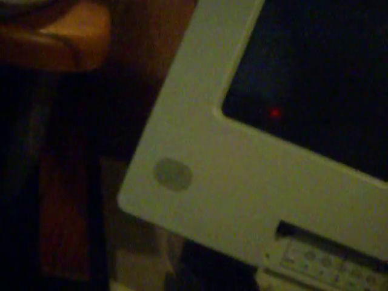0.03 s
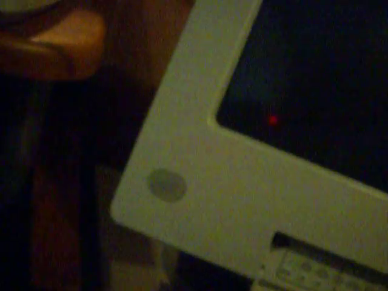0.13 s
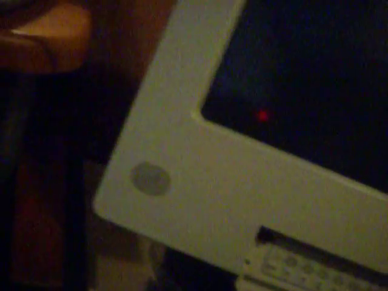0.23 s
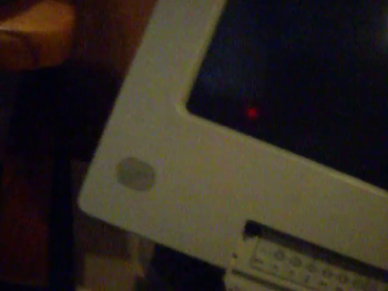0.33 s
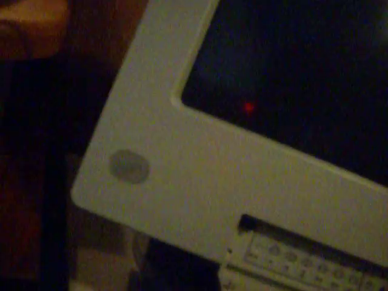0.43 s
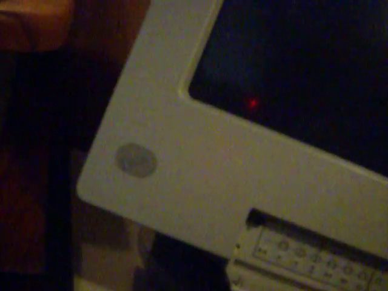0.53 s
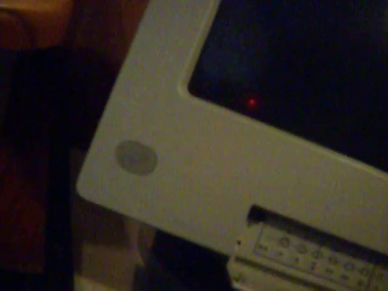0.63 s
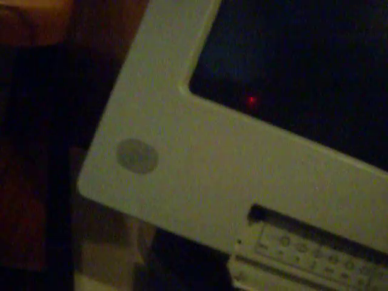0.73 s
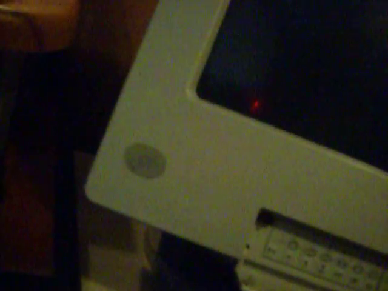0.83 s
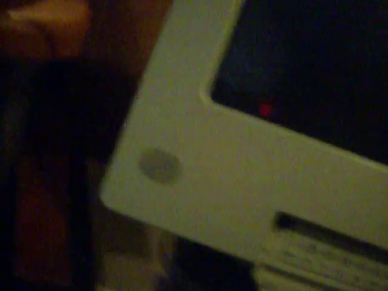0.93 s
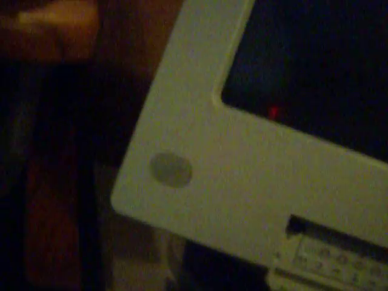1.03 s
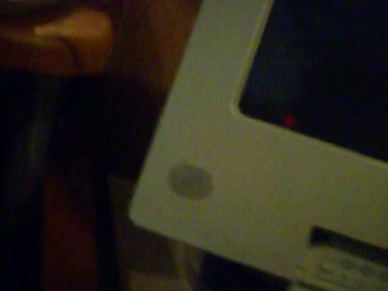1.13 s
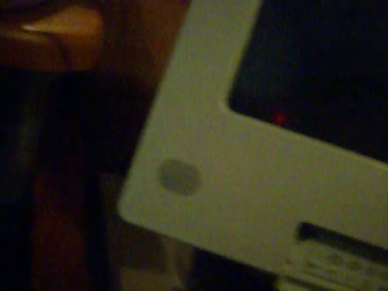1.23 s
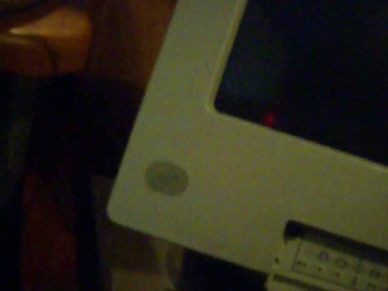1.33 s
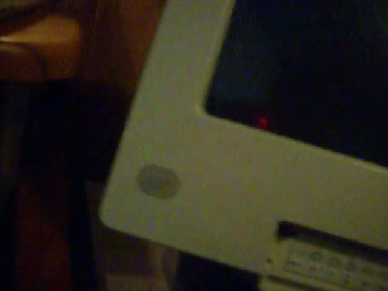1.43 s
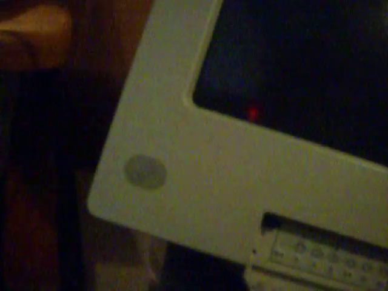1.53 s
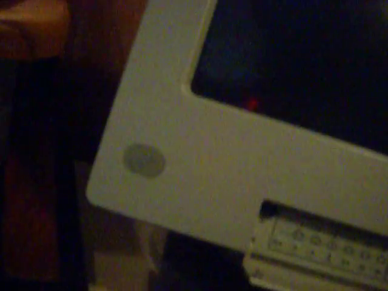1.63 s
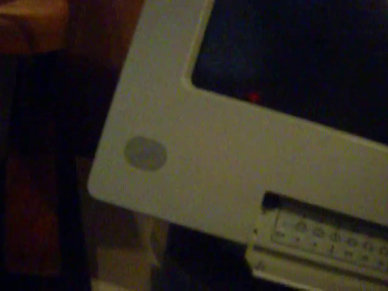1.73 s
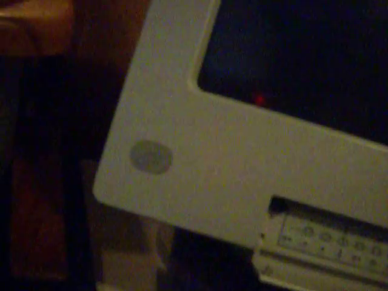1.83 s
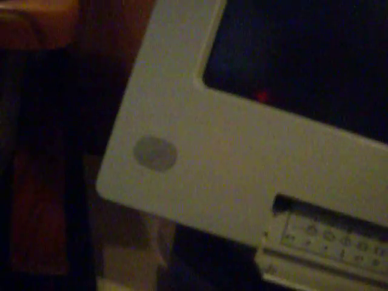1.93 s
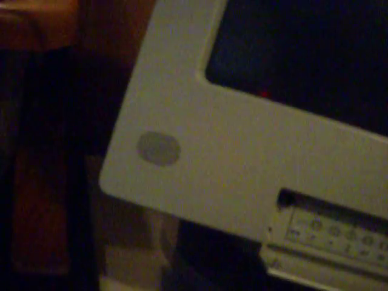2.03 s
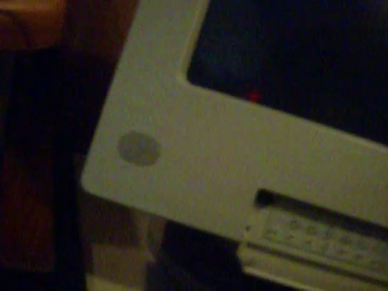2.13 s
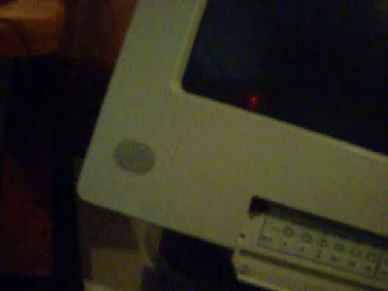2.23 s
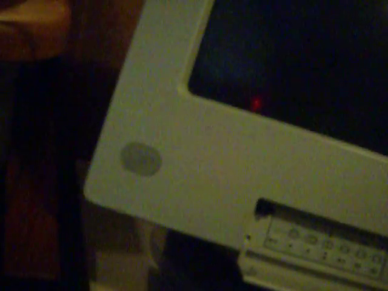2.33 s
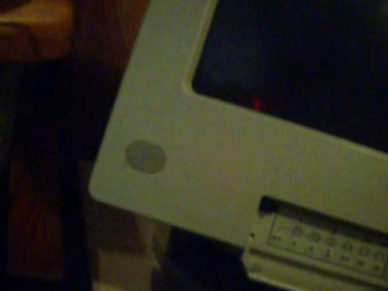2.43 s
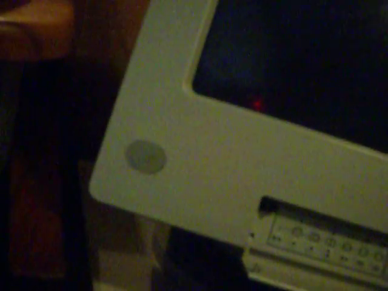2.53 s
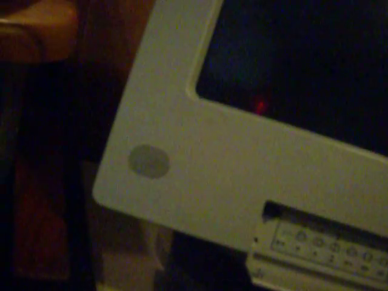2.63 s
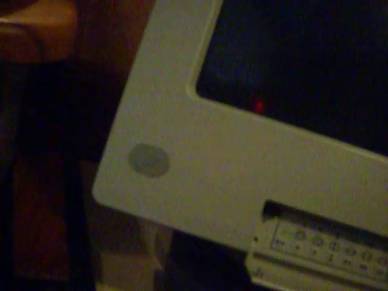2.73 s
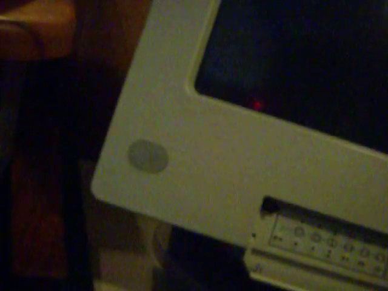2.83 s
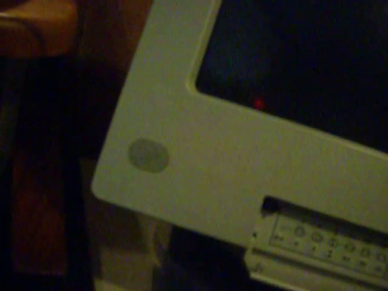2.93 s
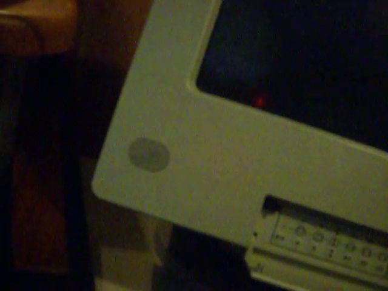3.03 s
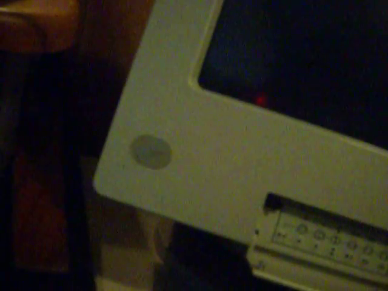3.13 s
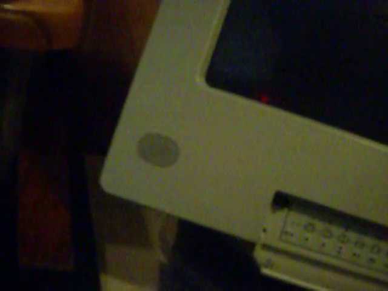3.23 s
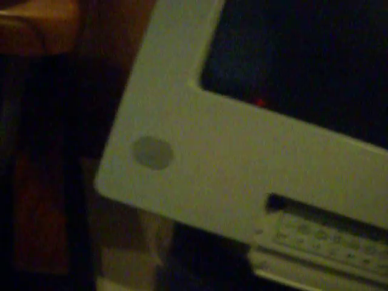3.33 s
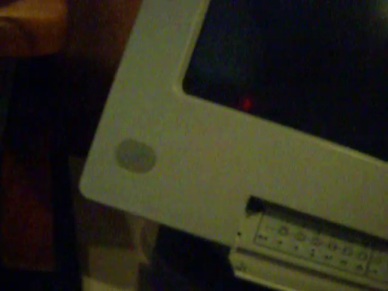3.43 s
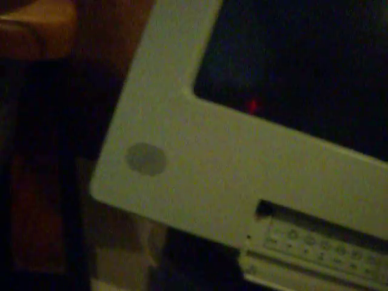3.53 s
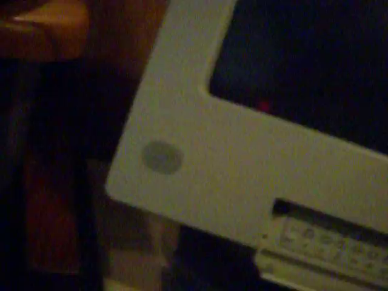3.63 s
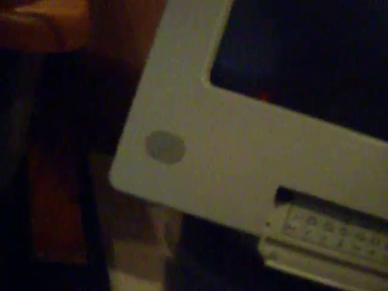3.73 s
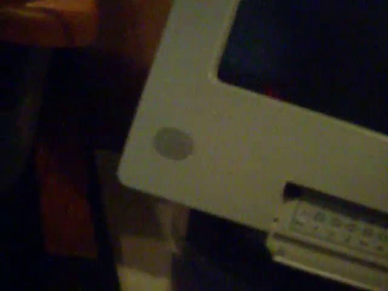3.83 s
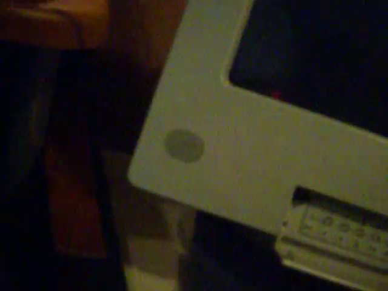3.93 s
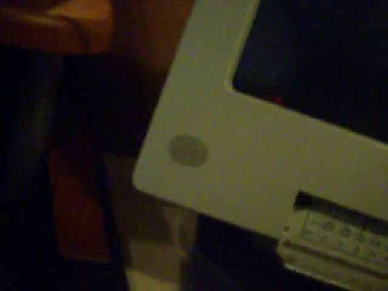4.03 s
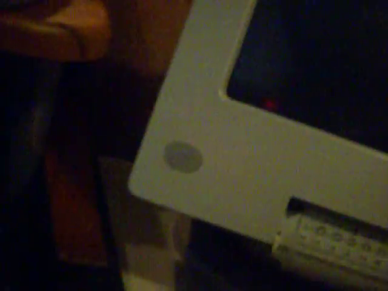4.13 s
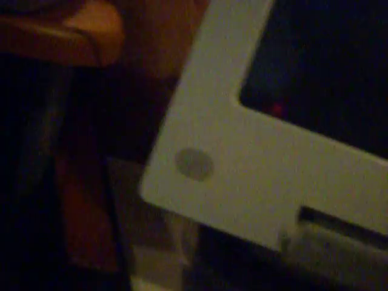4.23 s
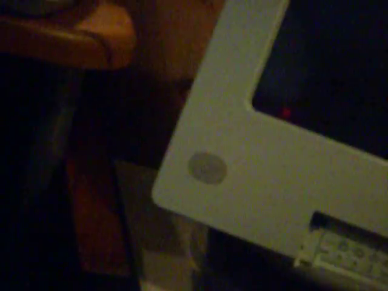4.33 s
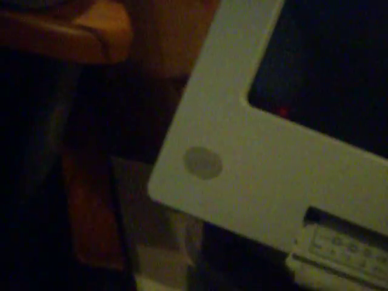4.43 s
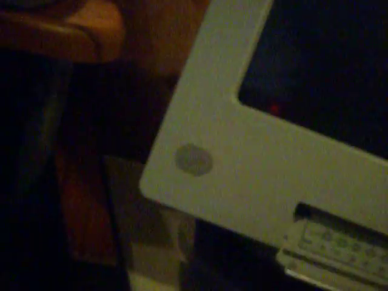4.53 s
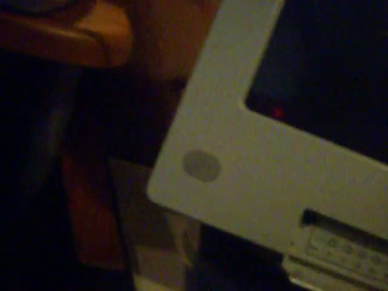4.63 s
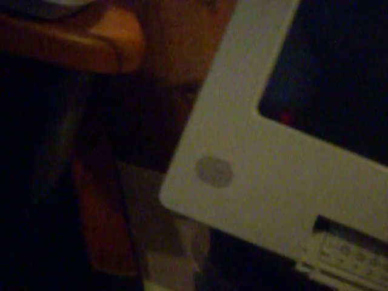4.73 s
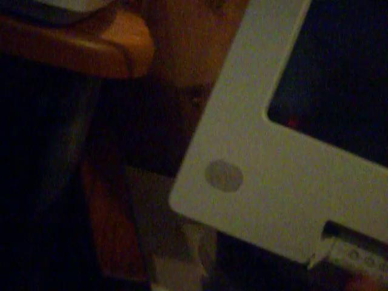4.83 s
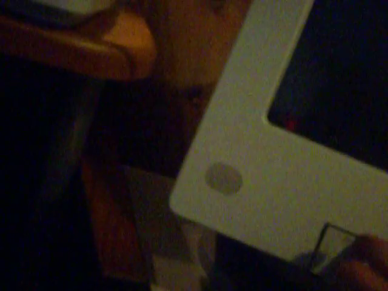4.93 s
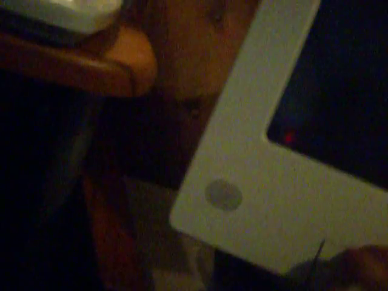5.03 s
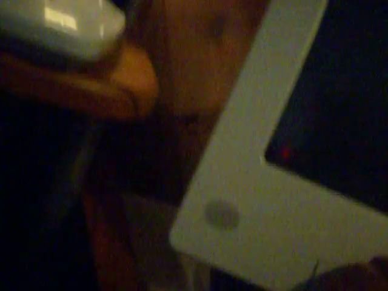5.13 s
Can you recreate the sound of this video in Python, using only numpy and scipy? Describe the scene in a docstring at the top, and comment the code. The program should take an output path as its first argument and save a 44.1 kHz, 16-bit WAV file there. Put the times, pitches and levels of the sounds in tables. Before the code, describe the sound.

Hollow plastic knocks, clicks and rattles on an old monitor's cabinet, in bursts growing louder, over quiet room hum and thin high whine.

```python
"""Plastic cabinet, close, in a quiet room

A switch, a relay and a flap of a plastic monitor cabinet click, knock and rattle near a small camera's microphone.
Each blow rings the modes of five cabinet parts by a touch and dying chatter; fingers brush as grainy noise.
Behind lie noise-made room air with the bands of a fan, hiss, and two thin high tones from the electronics.
A sparse-tap room adds reverberation; the microphone chain overloads softly and rolls off the treble.
"""
import sys
import numpy as np
from scipy import signal
from scipy.fft import rfft, irfft
from scipy.io import wavfile
from scipy.ndimage import uniform_filter1d

SR = 44100
rng = np.random.default_rng(int(sys.argv[2]) if len(sys.argv) > 2 else 0)


def dump(signal):
    """Clip the signal to [-1, 1] and save it as 16-bit WAV at the path in sys.argv[1]."""
    limited = np.clip(np.atleast_2d(signal).T, -1, 1)
    pcm = np.round(limited * 32767).astype(np.int16)
    wavfile.write(sys.argv[1], SR, pcm)


N = 228961  # length in samples

# Background air, shape before overall levelling: f/Hz, level/dB per Hz
AIR_SPECTRUM = [(12, -24), (20, -18), (59, -5.5), (186, -4), (286, -2), (606, -8), (732, -4.5),
                (815, -10.5), (957, -6), (1470, -16), (5490, -24), (6620, -23), (7180, -26), (10700, -23),
                (12300, -27), (16000, -81), (22000, -120)]
AIR_DB = -44.5  # rms level of the air
# Fan bands in the room: f/Hz, width/Hz, rms level/dB
FAN_BANDS = [(60, 3.8, -57.5), (118, 3, -63), (264, 118, -47.5), (711.7, 16, -55), (2480, 19, -65.5)]
# Dips of the background around the longest rattles: t/s, full depth/dB, sinking time/s
BACKGROUND_DIPS = [(1.86, -2.5, 0.044), (3.3, -2.5, 0.044), (4.05, -13.5, 0.12), (4.88, -16, 0.053)]
# Kicks of the microphone's resting line by the hardest blows: t/s, signed height scale/full scale
LINE_KICKS = [(1.858, -0.029), (3.129, -0.036), (3.299, 0.016), (4.062, 0.03), (4.42, 0.006),
              (4.885, 0.045)]
# Fingers sliding on the plastic and on the camera: t/s, length/s, level/dB, centre f/Hz
FINGER_RUBS = [(0.61, 1, -52.5, 60), (1.481, 0.47, -49, 2400), (1.576, 0.089, -52, 3900),
               (2.534, 0.11, -39, 236), (3.85, 0.44, -53, 2420), (1.996, 0.094, -50, 1880),
               (4.256, 0.044, -43, 3100), (4.401, 0.049, -35, 2620)]
# Blows on the cabinet: t/s, knock level/dB, clack level/dB, click level/dB, tick level/dB,
# struck spot f/Hz, chatter t60/s (before each part's own settling factor)
CABINET_BLOWS = [(0.051, -32.5, -41.5, -52, -52, 1170, .11), (0.453, -18, -43, -35, -40, 930, 0.13),
                 (1.249, -31, -54, -55, -52, 734, 0.11), (1.339, -32, -55, -54, -52, 600, 0.092),
                 (1.373, -25, -38, -39.5, -45, 910, 0.092), (1.592, -29, -39, -49, -46, 840, 0.087),
                 (1.647, -26, -47, -49, -51, 1030, 0.25), (1.747, -32, -29, -35, -46, 730, 0.2),
                 (1.788, -24.5, -28, -30.5, -49, 1270, 0.16), (1.8, -17, -25.5, -50, -44, 690, 0.17),
                 (1.858, -10.5, -11, -12, -12.5, 880, 0.12), (1.868, -11.5, -29, -33, -41, 810, 0.24),
                 (1.881, -28, -24, -26, -34, 751, 0.13), (1.906, -18, -20.5, -22.5, -25, 715, 0.11),
                 (1.917, -20.5, -31, -40, -50, 1000, .16), (1.973, -34, -32, -41, -48, 770, .14),
                 (2.001, -22, -27, -29, -46, 880, 0.12), (2.009, -23, -34, -31, -48, 690, .12),
                 (2.019, -12.5, -27, -36, -39, 900, 0.17), (2.054, -19, -23, -27, -28.5, 620, 0.21),
                 (2.065, -28, -19.5, -18, -40, 600, 0.083), (2.074, -20, -13, -26, -26.5, 1240, 0.076),
                 (2.085, -17.5, -19, -38, -45, 1270, 0.064), (2.113, -18.5, -23, -29, -32, 910, 0.12),
                 (2.158, -28, -50, -54, -54, 395, 0.066), (2.338, -31, -53, -49, -54, 720, 0.25),
                 (2.363, -29, -33.5, -39.5, -55, 1160, 0.12), (2.58, -37.5, -55, -54, -54, 400, 0.079),
                 (2.799, -31.5, -31, -37.5, -53, 885, 0.091), (2.955, -38, -35.5, -38, -54, 730, 0.1),
                 (3.1, -49, -36, -42, -48, 937, .1), (3.106, -31, -25, -34.5, -47, 1170, 0.098),
                 (3.128, -14, -16, -11, -22.5, 820, .22), (3.174, -11, -18.5, -20.5, -44, 810, 0.15),
                 (3.262, -22, -34, -39, -53, 960, 0.35), (3.283, -22, -22, -30, -36, 920, 0.24),
                 (3.3, -10, -14, -10.5, -17, 870, 0.19), (3.304, -8.5, -14, -33, -21, 870, 0.1),
                 (3.408, -32, -57, -56, -54, 412, 0.066), (4.04, -1.5, -6.5, -18, -18, 695, 0.048),
                 (4.046, -5, -8, -12.5, -21, 650, 0.069), (4.052, -17.5, -15.5, -21, -24, 700, 0.18),
                 (4.058, -18, -15, -10, -12.5, 680, 0.13), (4.114, -16, -21, -30.5, -34, 910, 0.21),
                 (4.281, -21, -32, -37, -50, 651, 0.34), (4.3, -3.5, -8, -20, -22.5, 1100, 0.056),
                 (4.313, -8.5, -18, -23.5, -31, 686, 0.14), (4.419, -1, -23, -20.5, -26.5, 750, 0.083),
                 (4.424, -18, -26, -35, -48, 510, 0.12), (4.5, -6, -17.5, -22, -29.5, 870, 0.12),
                 (4.555, -9, -23, -37, -48, 900, 0.13), (4.665, -4, -20, -25, -40, 755, 0.1),
                 (4.76, -25.5, -28.5, -34, -41, 869, 0.094), (4.862, -19.5, -35, -38, -48, 630, 0.16),
                 (4.88, -15, -19.5, -14, -15, 806, 0.22), (4.891, -18.5, -9.5, -21.5, -30, 700, 0.066),
                 (4.899, -14, -13, -18, -23, 1000, 0.068), (4.903, -26, -22, -25, -23, 1100, 0.036),
                 (4.911, -34, -29, -29, -45, 800, 0.06), (4.966, -31.5, -38, -34, -46, 738, 0.13),
                 (5.135, -20, -27, -29, -34.5, 1090, 0.19), (5.167, -12, -23, -24.5, -31.5, 900, .17)]
# Modes of the five cabinet parts, low to high, levels relative within a part: f/Hz, level/dB, t60/s
THUD_MODES = [(140, -16, 0.074), (224, -9, 0.092), (284, 4, 0.031), (338, -9, 0.027), (396.6, 6, 0.025),
              (479, -10.5, 0.07)]
KNOCK_MODES = [(605, -14, 0.011), (680, -2.5, 0.067), (718, 8.5, 0.025), (770, 6.5, 0.028),
               (867, 9.5, 0.045), (910, 0, 0.018), (1026, 13, 0.018), (1243, 7.5, 0.022), (1185, -21, 0.06),
               (1410, -15, 0.075), (1550, -39, 0.063)]
CLACK_MODES = [(1550, -27, .008), (2130, 19.5, 0.0032), (2060, -14, 0.026), (2250, -12, 0.0039),
               (2370, -7, 0.0071), (2620, 13, 0.0033)]
CLICK_MODES = [(2884, 3.5, 0.012), (3424, 21, 0.011), (3640, -0.5, 0.014), (3900, 20, 0.0056),
               (4200, -15, 0.0044), (4180, 10, 0.0058)]
TICK_MODES = [(6050, 13.5, 0.0018), (6180, -6.5, 0.001), (6840, -5, 0.00053), (8170, -4.5, 0.0019)]
# Room decay by band: f/Hz, t60/s
ROOM_DECAY = [(200, 0.22), (800, 0.4), (2500, 0.26), (8000, 0.26)]
# Treble response of the microphone chain: f/Hz, level/dB
MIC_ROLL_OFF = [(9000, 0.5), (10500, -2.5), (11500, -11), (12300, -24)]

WHINE_HZ, WHINE_DB = 6570, -52  # frequency between phase slips
FRAME_S, FIRST_S, SLIP_TURNS = .05001, .0024, .54  # frame period, first slip, turns lost per slip
PIPE_HZ, PIPE_DB = 7849.4, -65  # steady tone
SINK_CURVE, RECOVER_S = 0.54, 0.18  # dip: power of the sinking curve, recovery time constant
RISE_S, CLACK_HZ = 0.00092, 2140  # rise time of the contact noise, clack pitch
# the thud lies under the knock and grows on low-pitched spots
THUD_DB, THUD_DB_PER_OCTAVE, MIDDLE_HZ = -13, -16, 800
LUMPY = 0.55  # chatter is made of uneven contacts: 0 smooth, more = a few large ones
ROOM_DB, ROOM_TURN_HZ = -12.5, 8.2  # reverberation level, rotation rate of its three tails
EDGE_HZ = 12430  # upper band limit of the microphone chain


def gain_of(db):
    """dB to gain."""
    return 10 ** (np.asarray(db) / 20)


def evened(x):
    """Scales to rms 1."""
    return x / np.sqrt(np.mean(x ** 2) + 1e-20)


def read(points, hz):
    """Reads a spectrum on a log-frequency axis."""
    f, value = np.transpose(points)
    return np.interp(np.log(hz + 1), np.log(f + 1), value)


def add(mix, s, sound):
    """Mixes a sound in at s seconds."""
    part = mix[round(s * SR):][:len(sound)]
    part += sound[:len(part)]


def resonate(x, hz, width):
    """A two-pole resonance of gain 1."""
    return signal.lfilter(*signal.iirpeak(hz, hz / width, SR), x)


def room_air():
    """Room rumble and hiss from random short-time spectra, the bass slightly patchy, plus the fan's fuzzy bands."""
    frames, hz = N // 256 + 5, np.fft.rfftfreq(1024, 1 / SR)[:, None]
    real, imaginary, patches = rng.standard_normal((frames, 513, 3)).T
    patches = uniform_filter1d(patches, 8, 0)
    patches = evened(uniform_filter1d(patches, 12, 1))
    level_db = read(AIR_SPECTRUM, hz) + 3.2 * patches / (1 + hz / 1500)
    spectra = (real + 1j * imaginary) * gain_of(level_db)
    wash = signal.istft(spectra, nperseg=1024, noverlap=768)[1][:N]
    air = gain_of(AIR_DB) * evened(wash)
    for f, width, db in FAN_BANDS:
        air = air + gain_of(db) * evened(resonate(rng.standard_normal(N), f, width))
    return air


def electronics():
    """The sensor's line clock leaks in and slips its phase at every picture frame; a second tone is steady."""
    t = np.arange(N) / SR
    turns = WHINE_HZ * t - SLIP_TURNS * np.floor((t - FIRST_S) / FRAME_S)
    whine = resonate(np.sin(2 * np.pi * turns), WHINE_HZ, 900)
    pipe = np.sin(2 * np.pi * PIPE_HZ * t)
    return np.sqrt(2) * (gain_of(WHINE_DB) * whine + gain_of(PIPE_DB) * pipe)


def dips_db():
    """Each dip sinks, quickly at first, then creeps back."""
    out, t = np.zeros(N), np.arange(SR) / SR
    for s, db, sink in BACKGROUND_DIPS:
        sinking = np.minimum(t / sink, 1) ** SINK_CURVE
        recovery = np.exp(-np.maximum(t - sink, 0) / RECOVER_S)
        add(out, s, db * sinking * recovery)
    return out


def resting_line():
    """Each kick of the microphone's line is a quick step that sags back and overshoots slowly."""
    out, t = np.zeros(N), np.arange(SR) / SR
    step = 1 - np.exp(-t / .003)
    sag = 1.5 * np.exp(-t / .075) - .5 * np.exp(-t / .35)
    for s, height in LINE_KICKS:
        add(out, s, height * step * sag)
    return out


def fingers():
    """Skin on plastic: grainy noise in one broad resonance under each stroke."""
    out = np.zeros(N)
    for s, length, db, hz in FINGER_RUBS:
        grit, grain = rng.standard_normal((2, SR))[:, :round(length * SR)]
        grit = grit * gain_of(3.2 * evened(uniform_filter1d(grain, 120)))
        width = 0.76 * hz
        rub = evened(resonate(resonate(grit, hz, width), hz, width))
        add(out, s, gain_of(db) * rub * signal.windows.tukey(len(grit), .5))
    return out


def ring(modes, chance, touch, chatter, near_hz, spread_db=1.0, detune=0.028, focus_db=19.5):
    """One part rings: the touch favours modes near the struck spot's pitch, the chatter shakes all. Peak 1."""
    hz, db, t60 = np.transpose(modes)[:, :, None]
    size, pitch = chance[:len(modes)].T[:, :, None]
    t = np.arange(2400) / SR
    decay = gain_of(db + spread_db * size - 60 * t / t60)
    free = decay * np.sin(2 * np.pi * hz * (1 + detune * pitch) * t)
    focus = gain_of(-focus_db * abs(np.log2(hz / near_hz)))  # dB lost per octave from the spot
    touched = rfft((free * focus).sum(0), n=8192) * rfft(touch, n=8192)
    shaken = rfft(free.sum(0), n=8192) * rfft(chatter, n=8192)
    sound = irfft(touched + shaken)
    # the part radiates little outside its own range
    edges = signal.butter(N=2, Wn=[1.087 * hz.min(), 1.326 * hz.max()], btype="band", fs=SR, output="sos")
    sound = signal.sosfilt(edges, sound)
    return sound / abs(sound).max()


def cabinet():
    """Each blow is a touch followed by dying chatter of loose plastic; small stiff parts settle sooner."""
    out, t = np.zeros(N), np.arange(5700) / SR
    chances = rng.standard_normal((len(CABINET_BLOWS), 5, 11, 2))
    grits = rng.standard_normal((len(CABINET_BLOWS), 5700))
    grits = grits * abs(grits) ** LUMPY
    u = t / RISE_S
    for blow, chance, grit in zip(CABINET_BLOWS, chances, grits):
        s, knock_db, clack_db, click_db, tick_db, knock_hz, t60 = blow
        touch = 0.1 * grit * u * np.exp(1 - u) + 1.034 * (t == 0)  # contact noise and one sharp impulse
        thud_db = knock_db + THUD_DB + THUD_DB_PER_OCTAVE * np.log2(knock_hz / MIDDLE_HZ)
        # modes, level/dB, favoured f/Hz, settling factor on t60, chatter strength
        parts = [
            (KNOCK_MODES, knock_db, knock_hz, 1.14, 0.036),
            (THUD_MODES, thud_db, 0.53 * knock_hz, 2.58, 0.028),
            (CLACK_MODES, clack_db, CLACK_HZ, 0.76, 0.087),
            (CLICK_MODES, click_db, 2.2 * CLACK_HZ, 0.33, 0.046),
            (TICK_MODES, tick_db, 2.6 * CLACK_HZ, 0.34, 0.053),
        ]
        for (modes, db, hz, settle, loose), c in zip(parts, chance):
            dying = gain_of(-60 * t / max(settle * t60, .003))
            chatter = loose * grit * (1 - np.exp(-u)) * dying
            add(out, s, gain_of(db) * ring(modes, c, touch, chatter, hz))
    return out


def room(x):
    """Sparse taps of random sign, each band dying at its own speed; three tails take turns cyclically."""
    taps = np.zeros((3, SR // 2))
    at = np.arange(100, SR // 2 - 20, 20)
    places = at + rng.integers(0, 20, (3, len(at)))
    np.put_along_axis(taps, places, rng.choice([-1., 1.], (3, len(at))), 1)
    hz, t, z = signal.stft(taps, SR, nperseg=256)
    decay = gain_of(-60 * t / read(ROOM_DECAY, hz)[:, None])
    tails = signal.istft(z * decay, SR, nperseg=256)[1]
    phase = ROOM_TURN_HZ * np.arange(N) / SR + np.arange(3)[:, None] / 3
    turns = np.sqrt(2 / 3) * np.cos(2 * np.pi * phase)
    return signal.fftconvolve(x * turns, tails / np.linalg.norm(tails[0]), axes=1).sum(0)[:N]


def scene():
    """Cabinet and fingers in the room, over the background; the hiss dips less than the rumble and the tones."""
    near = cabinet() + fingers()
    dip_db = dips_db()
    air = room_air()
    rumble = signal.sosfiltfilt(signal.butter(N=1, Wn=900, fs=SR, output="sos"), air)
    hiss = air - rumble
    background = rumble * gain_of(0.6 * dip_db) + hiss * gain_of(0.055 * dip_db)
    background = background + electronics() * gain_of(dip_db)
    return (near + gain_of(ROOM_DB) * room(near) + background + resting_line())[None]


def record(dry):
    """The microphone chain: soft overload, treble roll-off, band limit."""
    soft = 0.72 * np.tanh(dry / 0.79)
    hz = np.linspace(0, SR / 2, 513)
    roll_off = signal.firwin2(255, hz, gain_of(read(MIC_ROLL_OFF, hz)), fs=SR)
    dull = signal.oaconvolve(soft, roll_off[None], "same")
    band_limit = signal.firwin(511, EDGE_HZ, window=("kaiser", 9), fs=SR)
    return signal.oaconvolve(dull, band_limit[None], "same")


dry = scene()
out = record(dry)
dump(out)
```